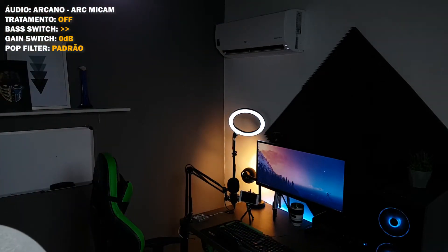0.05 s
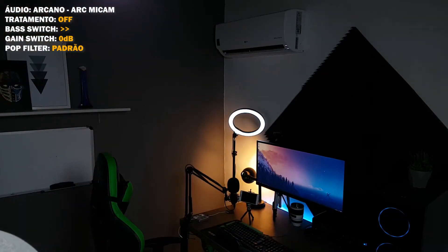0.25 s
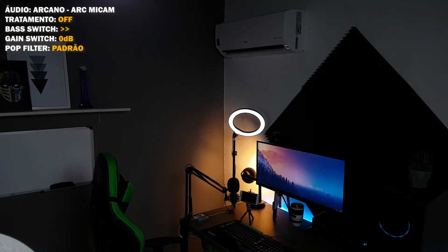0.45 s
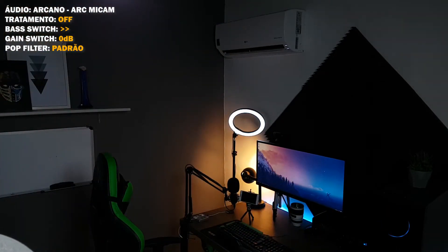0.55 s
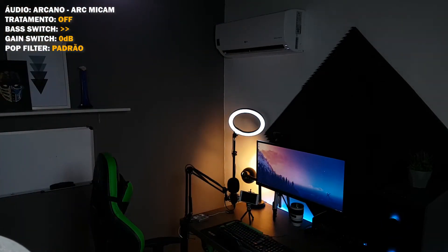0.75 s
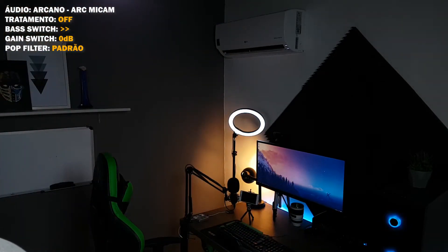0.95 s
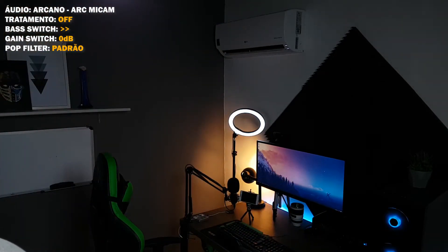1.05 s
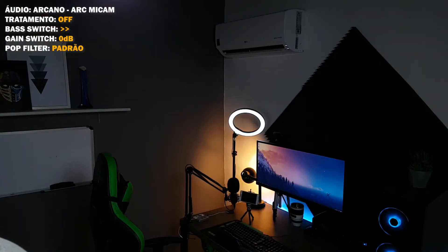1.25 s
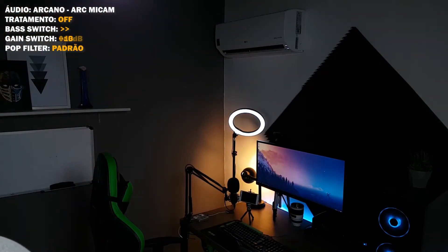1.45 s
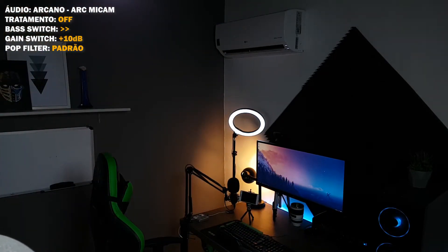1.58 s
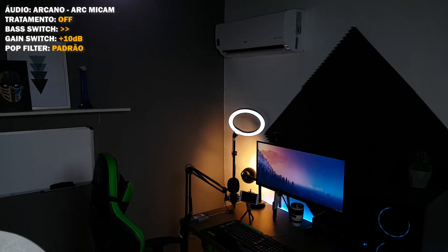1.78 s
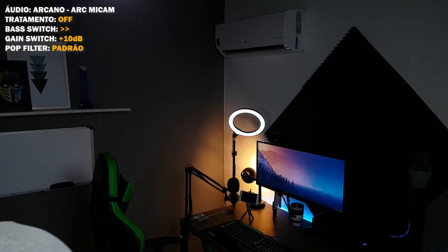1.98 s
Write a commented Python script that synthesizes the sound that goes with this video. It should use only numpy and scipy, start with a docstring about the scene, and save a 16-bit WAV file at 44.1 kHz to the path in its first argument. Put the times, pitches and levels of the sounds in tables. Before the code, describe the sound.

A small switch on a microphone snaps over with a loud click after faint finger handling noise

```python
"""Fingers handle a small microphone in a quiet room and flip its gain switch: knocks, ticks and the lever
are short force pulses ringing housing modes. Rubbing is friction noise through those modes; brushes are
short bright noise. Mains hum swells under the touch, over the low rumble of the moving hand. Hiss is
shaped noise and two faint whines are wavering sines; both are louder after the switch."""
import sys
import numpy as np
from scipy import signal
from scipy.fft import rfft, irfft
from scipy.io import wavfile
from scipy.ndimage import uniform_filter1d

SR = 44100
rng = np.random.default_rng(int(sys.argv[2]) if len(sys.argv) > 2 else 0)


def to_linear_factor(level_db):
    """Convert decibel levels (scalar or array-like) to linear amplitude factors."""
    exponent = np.asarray(level_db, float) / 20
    return 10 ** exponent


def to_wav(sig):
    """Store sig (one row per channel, or 1-D mono) as 16-bit WAV at the path in sys.argv[1].

    Samples outside -1..1 are clipped; the rate is SR.
    """
    pcm = np.clip(np.atleast_2d(sig), -1, 1) * 32767
    pcm = np.round(pcm).astype(np.int16)
    wavfile.write(sys.argv[1], SR, pcm.T)  # frames by channels


N = 88993

# hiss spectrum before the switch: f/Hz, relative density/dB
HISS_SPECTRUM = [(18, -34), (30, -14.5), (194, -5), (252, -8.5), (328, -7), (584, -11.5), (740, -11),
                 (1100, -12), (2680, -23.5), (5740, -33.5), (16000, -43)]
# hiss spectrum after the switch: f/Hz, relative density/dB
LOUD_HISS_SPECTRUM = [(59, -23), (100, -4.5), (308, -7.5), (415, -13), (570, -7), (621, -14), (891, -11.5),
                      (5770, -35), (16000, -58)]
# faint whines: f/Hz, level before the switch/dB, rms pitch waver/Hz
WHINE_TONES = [(1064, -76, 3.8), (5717, -87, 15)]
# rumble of the moving hand: t/s, level/dB
RUMBLE_LEVEL = [(0, -87), (.12, -61), (.17, -52), (.3, -63), (.34, -66.5), (.7, -71), (1.0, -57),
                (1.15, -53), (1.3, -77), (1.43, -50.5), (1.47, -46), (1.52, -49), (1.7, -77), (2.02, -76.5)]
# mains hum, level of the fundamental: t/s, level/dB
HUM_LEVEL = [(0, -74.5), (.13, -72), (.18, -52.5), (.28, -57.5), (.34, -71), (.64, -61), (1.0, -55.5),
             (1.11, -89), (1.2, -54), (1.42, -57), (1.53, -51), (1.62, -48), (1.67, -57), (1.85, -55.5),
             (2.02, -64.5)]
# skin dragging on the housing: t/s, level/dB
RUB_LEVEL = [(0, -105), (.11, -69), (.16, -64.5), (.29, -60), (.33, -69), (.68, -67.5), (.75, -63),
             (.97, -59.5), (1.01, -54), (1.08, -55), (1.13, -55.5), (1.2, -61), (1.43, -65), (1.46, -69.5),
             (1.53, -59.5), (1.6, -54.5), (1.7, -48.5), (1.76, -61), (1.85, -61), (2.02, -65.5)]
# fingertip brushes: centre t/s, length/s, level/dB
BRUSH_EVENTS = [(0.171, 0.016, -69), (0.554, 0.029, -65.5), (0.725, 0.018, -65.5), (0.757, 0.048, -70),
                (0.895, 0.034, -68), (1.02, 0.096, -69.5), (1.072, 0.049, -80), (1.69, 0.011, -73),
                (1.818, 0.024, -58)]
# brush spectrum: f/Hz, relative level/dB
BRUSH_SPECTRUM = [(1500, -0.5), (2500, -0.5), (3500, 5), (5000, -7.5), (7500, -8), (10000, -35)]
# room tail spectrum: f/Hz, relative level/dB
ROOM_SPECTRUM = [(150, 0), (500, 0), (1500, -6.5), (3000, -8.5), (6000, -16), (8500, -24.5), (11000, -47)]
# deep ring of the housing: f/Hz, level/dB, t60/s
DEEP_MODES = [(271.9, -11, 0.16), (369.4, 6, 0.049), (409.6, -4.5, 0.048)]
# higher ring of the housing: f/Hz, level/dB, t60/s
HIGH_MODES = [(482, -1, 0.059), (529, 0.5, 0.045), (606, -13.5, 0.11), (896, -11.5, 0.031)]
# thin shell that ticks: f/Hz, level/dB, t60/s
SHELL_MODES = [(1104, 4.5, 0.035), (1730, -5.5, 0.035), (2080, 0, 0.042), (2540, 1.5, 0.027)]
# short modes under the nail: f/Hz, level/dB, t60/s
CLACK_MODES = [(1500, -31, 0.06), (2353, 5.5, 0.011), (2591, 1, 0.0072), (3260, 2, 0.0073)]
# bright modes of the snap: f/Hz, level/dB, t60/s
SNAP_MODES = [(3980, -8, 0.0025), (5330, 2, 0.0063), (6530, -3, 0.0042), (7160, -0.5, 0.0027),
              (9400, -7, 0.0029), (13430, -23.5, .002)]
# switch lever: f/Hz, level/dB, t60/s
LEVER_MODES = [(428, -0.5, .05), (672.5, -6, .04), (858, -12.5, 0.036), (1038, -17, 0.048),
               (1676, -10.5, 0.026), (2644, 5, 0.0077), (2880, 1.5, 0.012), (3110, 0, 0.0088)]
# capsule on its mount: f/Hz, level/dB, t60/s
THUMP_MODES = [(95, -6, 0.025), (156, -8.5, 0.0097)]
# ticks of nail and switch: t/s, shell/dB, clack/dB, snap/dB, top of the snap f/Hz
TICK_EVENTS = [(0.1239, -56, -65, -68, 6000), (0.131, -63, -58, -80, 6000), (0.1675, -65, -57, -85, 6200),
               (0.172, -73, -57, -85, 6000), (0.2605, -59.5, -71, -76, 6000), (0.273, -65, -63, -78, 6000),
               (1.0264, -38, -30, -42.5, 8300), (1.063, -55, -64, -87, 6000),
               (1.1524, -55.5, -54, -58.5, 7150), (1.446, -32, -38, -24, 15200),
               (1.4498, -47.5, -34, -17, 13000), (1.4672, -51, -49.5, -66, 7000),
               (1.6241, -55, -47.5, -75, 5940), (1.665, -75, -51.5, -77, 6000),
               (1.695, -58, -53.5, -66, 7000), (1.8164, -56, -48, -51, 8200)]
# lever leaving one seat and landing in the other: t/s, level/dB
FLIP_EVENTS = [(1.4453, -21.5), (1.4493, -7)]
# knocks: t/s, deep ring/dB, higher ring/dB, thump/dB
KNOCK_EVENTS = [(0.1238, -43, -37, -75), (.132, -46.5, -45.5, -56), (0.1645, -53, -63, -57),
                (0.1712, -45, -62, -62), (0.203, -74, -58, -71), (0.2598, -60, -46.5, -56),
                (.270, -46, -52.5, -60), (.2755, -47, -69, -38), (.403, -71, -54.5, -73),
                (.54, -87, -56.5, -45), (.719, -47.5, -64, -32), (0.764, -53, -85, -51),
                (1.0278, -30.5, -43, -17), (1.064, -64, -45.5, -42), (1.099, -50.5, -54, -34),
                (1.1525, -86, -40.5, -25.5), (1.239, -54, -73, -38), (1.4415, -50, -36, -22.5),
                (1.4445, -10.5, -21, -48), (1.4501, -7.5, -15.5, -0.5), (1.4639, -32.5, -46, -20),
                (1.6245, -38, -58, -57), (1.633, -45, -52, -42), (1.653, -36.5, -47, -30.5),
                (1.666, -30.5, -40, -62), (1.673, -32, -41.5, -61), (1.681, -41.5, -58, -50),
                (1.691, -35, -42, -59), (1.806, -35.5, -37, -35), (1.811, -60, -40, -52),
                (1.817, -44, -60, -39.5), (1.827, -57, -49, -35)]

HISS_DB, LOUD_HISS_DB = -63.5, -56
SWITCH_S, WHINE_STEP_DB = 1.452, 6
RUMBLE_HZ = 32.8
MAINS_HZ, OCTAVE_DB, HUM_WAVER_DB = 60, -12, 2
RUB_SHELL_DB, RUB_FLICKER_DB = -14, 2.5
ROOM_DB, ROOM_SPLIT_HZ, ROOM_BUILD_S = -29, 1100, 0.0033
ROOM_T60_S, ROOM_TREBLE_T60_S = 0.93, 0.3
PUSH_S, THUMP_PUSH_S, HARD_PUSH_S = 0.00079, 0.0015, 0.000087
BODY_RISE_S, THUMP_RISE_S, SHELL_RISE_S = 0.0013, 0.0013, 0.00064  # blow spreading through the housing
RATTLE_DECAY_S = 0.0006
LOW_CUT_HZ, CEILING, TOP_HZ = 43.6, 0.95, 16200  # CEILING: full scale = 1


def seconds():
    """Time axis."""
    return np.arange(N) / SR


def unit(x):
    """Scale to rms 1."""
    return x / np.sqrt(np.mean(x ** 2))


def curve(rows):
    """Gain along a (t/s, level/dB) table."""
    t, db = np.array(rows).T
    return to_linear_factor(np.interp(seconds(), t, db))


def coloured(points):
    """Noise of rms 1 with a (f/Hz, level/dB) spectrum, interpolated over log f."""
    hz, db = np.array(points).T
    f = np.fft.rfftfreq(N, 1 / SR) + 1  # +1 keeps the log finite
    gain = to_linear_factor(np.interp(np.log(f), np.log(hz), db))
    return unit(irfft(rfft(rng.standard_normal(N)) * gain, N))


def walk(rate_hz):
    """Smooth random wander, rms 1."""
    k = int(SR / rate_hz)
    steps = np.repeat(rng.standard_normal(N // k + 1), k)
    return unit(uniform_filter1d(steps, k)[:N])


def ring(x, modes, rise_s=1e-5):
    """Resonances that build up, then decay; a unit impulse rings near each mode's level."""
    out = 0
    keep = np.exp(-1 / (rise_s * SR))
    for hz, db, t60_s in modes:
        turn = np.exp(2j * np.pi * hz / SR)
        decay = np.exp(-np.log(1000) / (t60_s * SR))
        fed = signal.lfilter([1 - keep], [1, -keep * turn], x)
        out = out + to_linear_factor(db) * signal.lfilter([1], [1, -turn * decay], fed).imag
    return out


def strikes(rows, col, shapes):
    """One force shape per row, sized by a dB column; shapes: one for all, or one per row."""
    x = np.zeros(N + 2048)
    shapes = np.broadcast_to(shapes, (len(rows), shapes.shape[-1]))
    for row, shape in zip(rows, shapes):
        i = int(row[0] * SR)
        x[i:i + len(shape)] += to_linear_factor(row[col]) * shape
    return x[:N]


def push(length_s):
    """Smooth contact force: sin^2 pulse of unit area."""
    force = np.sin(np.pi * np.clip(np.arange(512) / SR / length_s, 0, 1)) ** 2
    return force / force.sum()


def hiss():
    """Background hiss: one shaped noise before the switch, a louder one after."""
    quiet = to_linear_factor(HISS_DB) * coloured(HISS_SPECTRUM)
    loud = to_linear_factor(LOUD_HISS_DB) * coloured(LOUD_HISS_SPECTRUM)
    return np.where(seconds() > SWITCH_S, loud, quiet)


def whines():
    """Faint sines wavering in pitch and level, lifted by the gain step."""
    after = seconds() > SWITCH_S
    out = 0
    for hz, db, waver_hz in WHINE_TONES:
        phase = 2 * np.pi * np.cumsum(hz + waver_hz * walk(30)) / SR
        tone = np.sqrt(2) * np.sin(phase) * to_linear_factor(1.8 * walk(12))
        out = out + to_linear_factor(db + WHINE_STEP_DB * after) * tone
    return out


def rumble():
    """Slow noise of the moving hand, peaking at RUMBLE_HZ."""
    spectrum = [(RUMBLE_HZ / 2, -15), (RUMBLE_HZ, 0), (RUMBLE_HZ * 2, -14), (300, -60)]
    return curve(RUMBLE_LEVEL) * coloured(spectrum)


def hum():
    """Mains fundamental and octave, wavering in level."""
    phase = 2 * np.pi * MAINS_HZ * seconds()
    tone = np.sqrt(2) * (np.sin(phase) + to_linear_factor(OCTAVE_DB) * np.sin(2 * phase))
    return curve(HUM_LEVEL) * to_linear_factor(HUM_WAVER_DB * walk(25)) * tone


def brushes():
    """Fingertip brushes: bright flickering noise in Gaussian bursts."""
    t = seconds()
    touch = sum(to_linear_factor(db) * np.exp(-(2 * (t - at) / length) ** 2) for at, length, db in BRUSH_EVENTS)
    return touch * to_linear_factor(2.5 * walk(170)) * coloured(BRUSH_SPECTRUM)


def rubbing():
    """Skin friction: uneven noise drives the housing and shell modes."""
    drag = rng.standard_normal(N) * to_linear_factor(RUB_FLICKER_DB * walk(60))
    body = unit(ring(drag, DEEP_MODES) + ring(drag, HIGH_MODES))
    shell = unit(ring(drag, SHELL_MODES + CLACK_MODES))
    return curve(RUB_LEVEL) * (body + to_linear_factor(RUB_SHELL_DB) * shell)


def room(x):
    """Diffuse tail of decaying noise whose treble dies sooner."""
    t = seconds()
    noise = coloured(ROOM_SPECTRUM)
    dull = signal.lfilter(*signal.butter(1, ROOM_SPLIT_HZ, fs=SR), noise)
    tail = dull * to_linear_factor(-60 * t / ROOM_T60_S) + (noise - dull) * to_linear_factor(-60 * t / ROOM_TREBLE_T60_S)
    build = np.clip(t / ROOM_BUILD_S, 0, 1)
    return to_linear_factor(ROOM_DB) * signal.fftconvolve(x, tail * build)[:N]


def snaps():
    """Brief low-passed rattles of unit energy ring the bright modes; the room answers."""
    decay = np.exp(-np.arange(256) / SR / RATTLE_DECAY_S)
    rattles = []
    for row in TICK_EVENTS:
        burst = rng.standard_normal(256) * decay
        burst = signal.lfilter(*signal.butter(4, row[4], fs=SR), burst)
        rattles.append(burst / np.sqrt((burst ** 2).sum()))
    direct = ring(strikes(TICK_EVENTS, col=3, shapes=np.array(rattles)), SNAP_MODES)
    return direct + room(strikes(TICK_EVENTS, col=3, shapes=np.ones(1)))


def ticks():
    """Nail and switch: hard pushes ring shell and clack modes, with bright snaps."""
    hard = push(HARD_PUSH_S)
    shell = ring(strikes(TICK_EVENTS, col=1, shapes=hard), SHELL_MODES, SHELL_RISE_S)
    clack = ring(strikes(TICK_EVENTS, col=2, shapes=hard), CLACK_MODES, SHELL_RISE_S)
    return shell + clack + snaps()


def lever():
    """Switch lever leaving and landing: two hard pushes ring its modes."""
    return ring(strikes(FLIP_EVENTS, col=1, shapes=push(HARD_PUSH_S)), LEVER_MODES, SHELL_RISE_S)


def knocks():
    """A soft push rings the body, a longer one thumps the capsule on its mount."""
    soft = push(PUSH_S)
    deep = ring(strikes(KNOCK_EVENTS, col=1, shapes=soft), DEEP_MODES, BODY_RISE_S)
    high = ring(strikes(KNOCK_EVENTS, col=2, shapes=soft), HIGH_MODES, BODY_RISE_S)
    thump = ring(strikes(KNOCK_EVENTS, col=3, shapes=push(THUMP_PUSH_S)), THUMP_MODES, THUMP_RISE_S)
    return -(deep + high + thump)


def scene():
    """All sources at the capsule, one channel."""
    background = hiss() + whines() + rumble() + hum()
    handling = brushes() + rubbing() + ticks() + lever() + knocks()
    return (background + handling)[None]


def top_cut(x):
    """Nothing passes above the cut-off."""
    return signal.sosfilt(signal.butter(12, 16430, fs=SR, output="sos"), x)


def record(dry):
    """Microphone thins the deepest bass; input stage rounds the loudest peak; a steep low-pass follows."""
    thin = signal.lfilter(*signal.butter(1, LOW_CUT_HZ, "high", fs=SR), dry)
    rounded = CEILING * np.tanh(thin / CEILING)
    low_pass = signal.ellip(8, 0.2, 70, TOP_HZ, fs=SR, output="sos")
    return top_cut(signal.sosfilt(low_pass, rounded))


dry = scene()
out = record(dry)
to_wav(out)
```